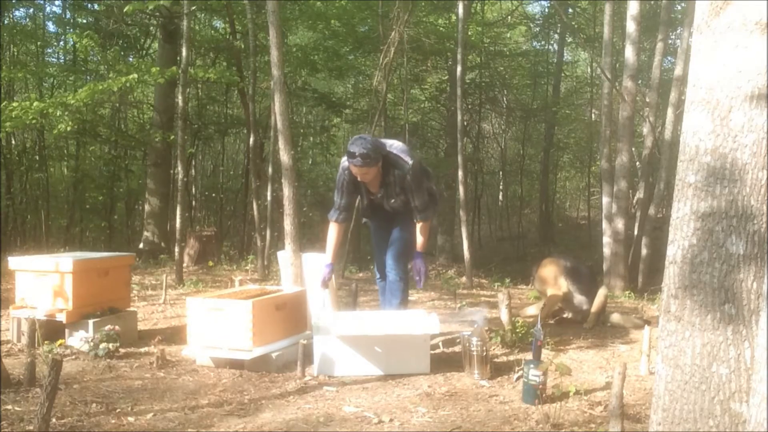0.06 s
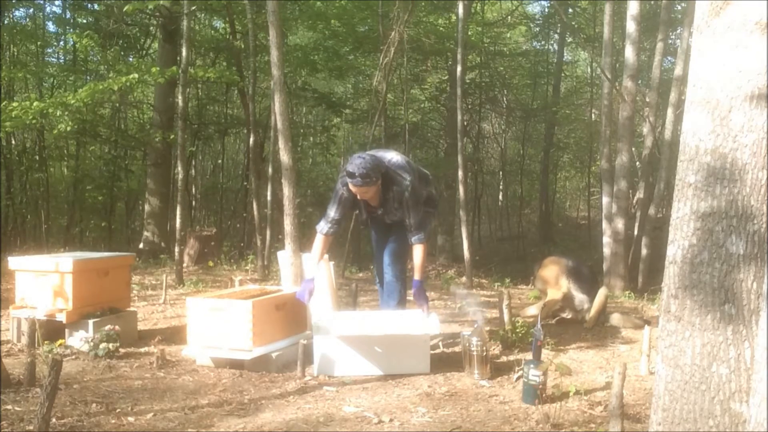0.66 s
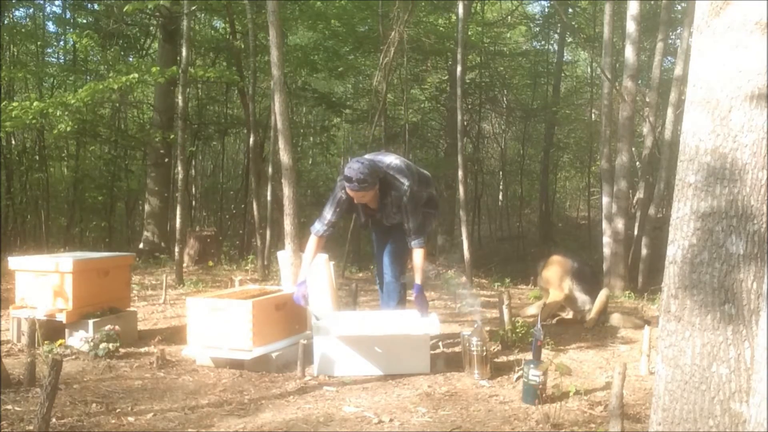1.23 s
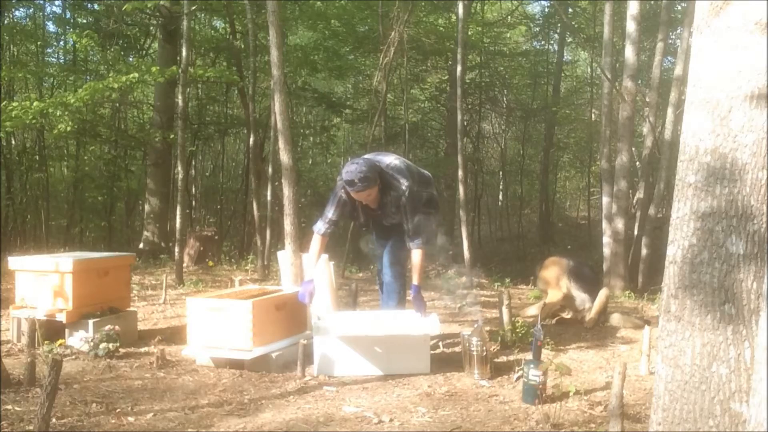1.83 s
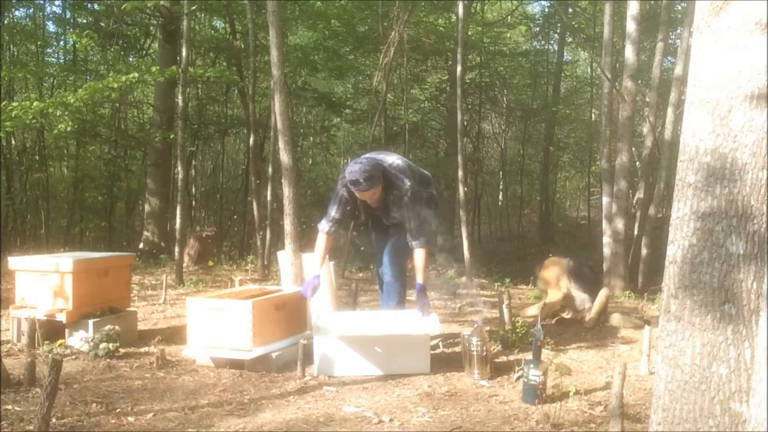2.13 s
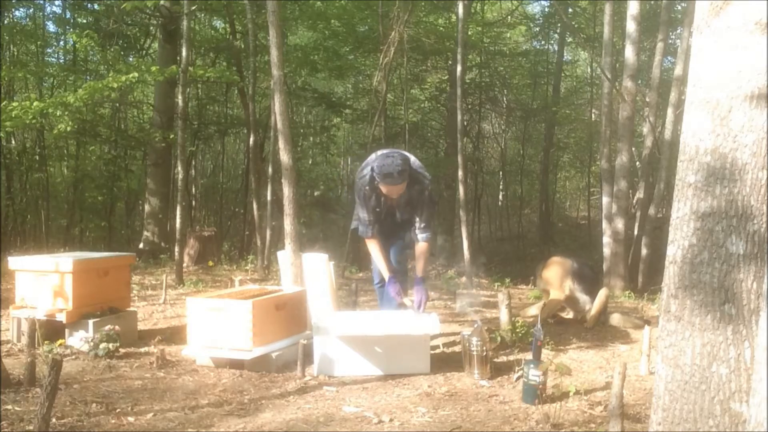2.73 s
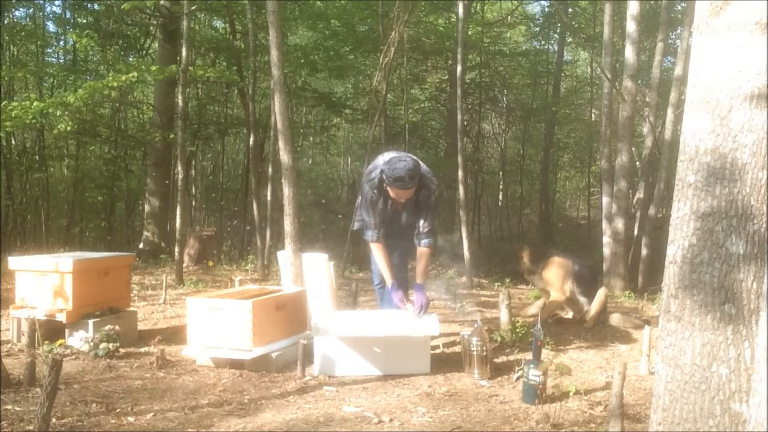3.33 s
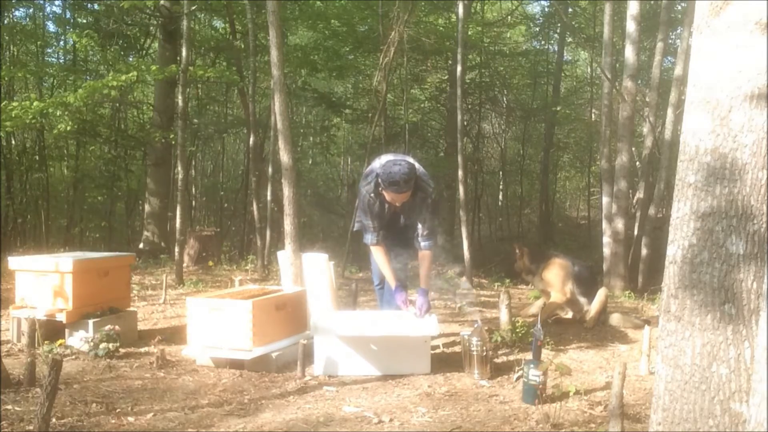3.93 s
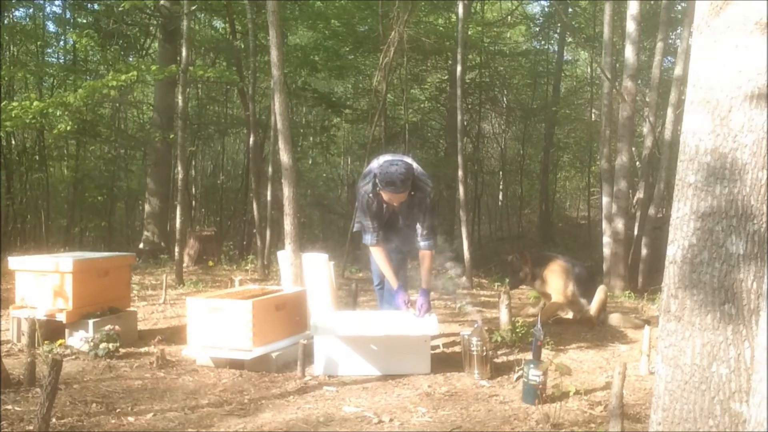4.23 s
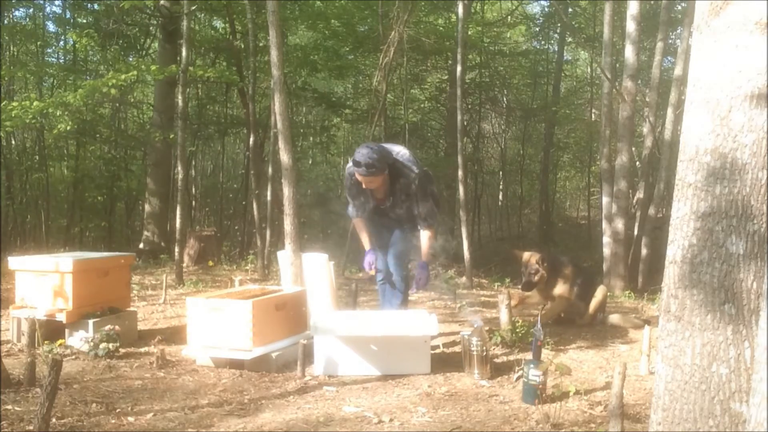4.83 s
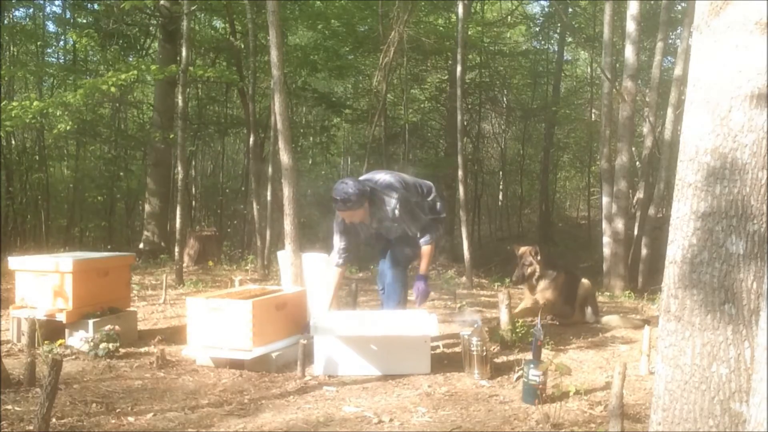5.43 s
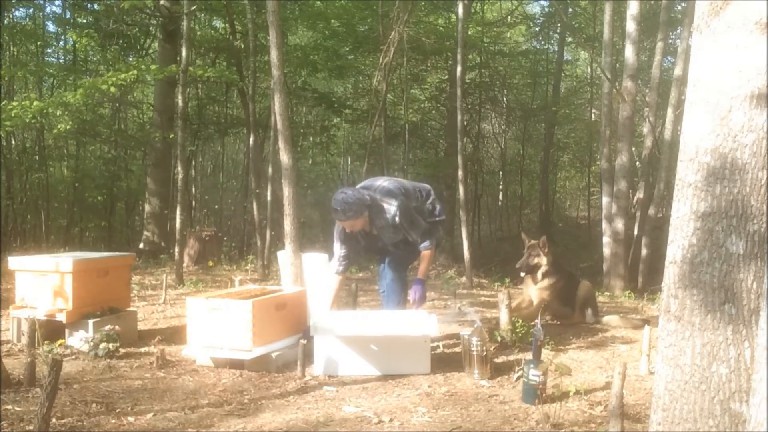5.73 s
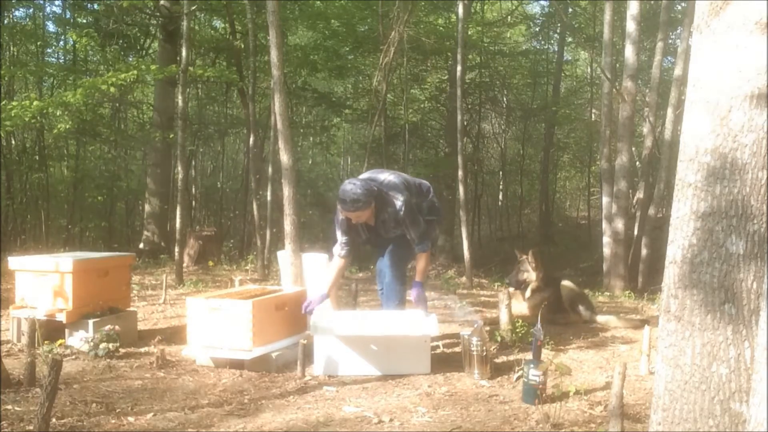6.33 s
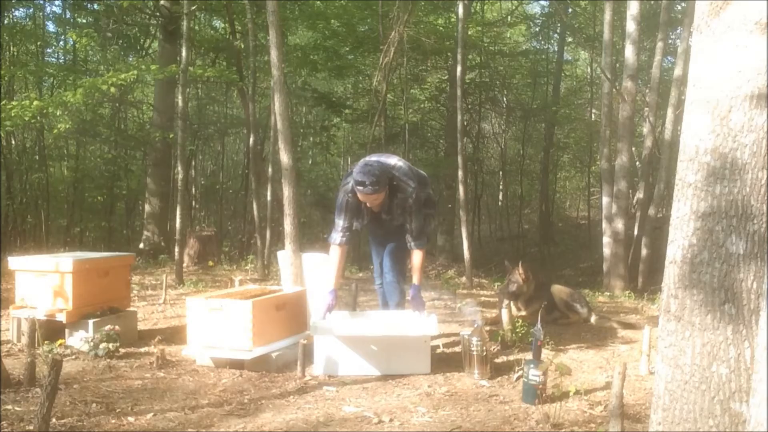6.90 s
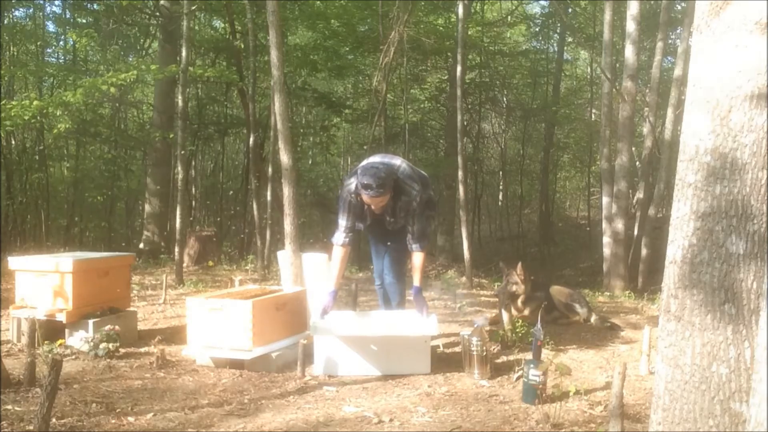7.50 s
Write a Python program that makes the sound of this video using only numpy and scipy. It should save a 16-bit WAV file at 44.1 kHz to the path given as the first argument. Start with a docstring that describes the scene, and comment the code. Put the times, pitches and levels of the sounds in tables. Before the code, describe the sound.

A sharp wooden double knock, lighter bumps and a few metal clinks stand out over softly buzzing bees and a far engine's drone.

```python
"""Open beehive in a wood

Honeybees hum a few metres away, each with its own wingbeat, over a distant engine's drone.
The keeper knocks wooden hive parts together, ringing the box, then picks up a steel tool
that clinks and scrapes. Two birds sing far off, echoed by the trunks; dry leaves rustle faintly."""
import sys
import numpy as np
from scipy import signal
from scipy.fft import rfft, irfft
from scipy.io import wavfile
from scipy.ndimage import map_coordinates

SR = 44100
rng = np.random.default_rng(int(sys.argv[2]) if len(sys.argv) > 2 else 0)


def generate_wav(sig):
    """Save sig (samples, or channels by samples) to the path in sys.argv[1] as 16-bit PCM at SR."""
    pcm = np.round(np.clip(np.atleast_2d(sig).T, -1, 1) * 32767).astype(np.int16)
    wavfile.write(sys.argv[1], SR, pcm)


N = 333396
TIME_S = np.arange(N) / SR


def undb(db):
    """Decibels to gain."""
    return 10 ** (np.asarray(db) / 20)


def unit_rms(x):
    """Scale to rms 1."""
    return x / np.sqrt(np.mean(x ** 2) + 1e-30)


def wander(rate_hz):
    """Smooth random curve, spread near 1."""
    knots = rng.standard_normal(1024)
    return map_coordinates(knots, [TIME_S[::64] * rate_hz + 2], order=3, mode="wrap").repeat(64)[:N]


def colour(x, spectrum):
    """Filter by (f/Hz, gain/dB) points, then scale to rms 1."""
    hz, db = np.transpose(spectrum)
    bins_hz = np.maximum(np.fft.rfftfreq(len(x), 1 / SR), 1)
    gain = undb(np.interp(np.log(bins_hz), np.log(hz), db))
    return unit_rms(irfft(rfft(x) * gain, len(x)))


def highpass(x, cutoff_hz):
    """Second-order low cut."""
    return signal.sosfilt(signal.butter(2, cutoff_hz, "high", fs=SR, output="sos"), x)


def decay(t, t60_s):
    """Exponential fall, 60 dB in t60_s."""
    return np.exp(-np.log(1000) * t / t60_s)


def add(out, start_s, x):
    """Mix x in at start_s."""
    i = max(int(start_s * SR), 0)
    out[i:i + len(x)] += x[:max(N - i, 0)]


def tree_echo(x, t60_s):
    """Diffuse echo scattered back by the trunks."""
    t = TIME_S[:SR]
    response = rng.standard_normal(SR) * decay(t, t60_s) * (1 - np.exp(-t / 0.007))
    return signal.fftconvolve(x, response / np.linalg.norm(response))[:N]


# Wing tone envelope: wingbeat multiple, relative level/dB
WING_HARMONICS = [(1, -1.5), (2, 1), (3, -8), (4, -5), (5, -4.5), (6, -10.5), (8, -27.5), (12, -26)]


def bees(count=24, wingbeat_hz=246.1, spread=0.085, waver=0.03, level_db=-60.5):
    """Each bee has its own wavering wingbeat, and swells and fades as it circles."""
    harmonics = np.arange(1, 15)
    gains = undb(np.interp(harmonics, *np.transpose(WING_HARMONICS)))
    cycle = np.linspace(0, 1, 513)
    out = np.zeros(N)
    for detune in np.linspace(-spread, spread, count):
        offsets = rng.random((len(harmonics), 1))
        stroke = gains @ np.sin(2 * np.pi * (np.outer(harmonics, cycle) + offsets))
        hz = wingbeat_hz * (1 + detune + waver * wander(2.5) + 0.016 * wander(28))
        hum = np.interp(np.cumsum(hz) / SR % 1, cycle, stroke)
        out += hum * undb(3.3 * wander(2.148) + 3.6 * wander(14))
    return unit_rms(out) * undb(level_db)


# Engine drone: firing-rate multiple, relative level/dB
ENGINE_ORDERS = [(2, -10.5), (3, -0.5), (4, -19.5), (5, -18.5), (6, -21)]


def engine(idle_hz=37.25, revved_hz=41.2, idle_db=-60.5, revved_db=-57.5):
    """A far engine idles, speeds up and swells as it pulls; only low orders cross the wood."""
    throttle_s, spin_up_s = 4.65, 1.2
    pull_db, pull_peak_s, pull_width_s = 9.5, 5.61, 0.7
    revs = 1 - np.exp(-(np.maximum(TIME_S - throttle_s, 0) / spin_up_s) ** 2)
    pull = np.exp(-((TIME_S - pull_peak_s) / pull_width_s) ** 2)
    fading_db = 2 * (1 - revs) * wander(3.92)
    level_db = idle_db + (revved_db - idle_db) * revs + pull_db * pull + fading_db
    firing_hz = (idle_hz + (revved_hz - idle_hz) * revs) * (1 + 0.01184 * wander(12))
    phase = 2 * np.pi * np.cumsum(firing_hz) / SR
    drone = sum(undb(db + 2 * wander(11)) * np.sin(order * phase + 0.5 * wander(9))
                for order, db in ENGINE_ORDERS)
    return unit_rms(drone) * undb(level_db)


# Still forest air: f/Hz, relative density/dB
AIR_SPECTRUM = [(20, -40), (40, -7.5), (70, 1), (100, 0), (170, -5), (320, -15.5), (400, -11), (620, -18),
                (1200, -22), (2000, -23), (5000, -32), (7800, -32), (8300, -35.5), (15000, -39)]


def air(level_db=-57):
    """Steady low hush of forest air."""
    return colour(rng.standard_normal(N), AIR_SPECTRUM) * undb(level_db + 0.1 * wander(2))


# Hive box modes: f/Hz, relative level/dB, t60/s
BOX_MODES = [(87, -6.5, 0.067), (148, 0.5, 0.037), (219.5, -1, 0.063), (315, -6, .09), (396, 7, 0.025),
             (435, -25, 0.0074), (613, 0.5, 0.027), (695, -1, 0.037), (780, 3, 0.0096), (986, -14, 0.029),
             (1060, -29, 0.026), (1184, -1, 0.02), (1460, -12, 0.033), (1790, -9.5, 0.032),
             (2387, -1.5, 0.012), (3016, -9, 0.022)]
# Crack of wood: f/Hz, relative density/dB
CRACK_SPECTRUM = [(200, -29), (800, 10), (2500, 0.5), (4200, -8), (6500, -5.5), (10000, -11.5),
                  (15000, -21)]
# Knocks: t/s, blow level/dB, blow f/Hz, crack re blow/dB, thud re blow/dB, thud f/Hz
BOX_KNOCKS = [(.99, -49, 600, -21, -6, 250), (1.3968, -17, 540, -17.5, -4.5, 315),
              (1.428, -15.5, 740, -23.5, -19, 350), (1.522, -44.5, 400, -25, -4, 250),
              (2.136, -42, 318, -20, -5, 250), (3.278, -45.5, 497, -25, 6, 185),
              (4.178, -36, 660, -13, 4.5, 154), (4.2077, -43.5, 2350, -0.5, -22, 250),
              (6.004, -47, 1120, -22, -30, 250), (6.011, -34.5, 287, -24, -12, 220),
              (6.908, -51.5, 1700, -11, -23, 250), (7.55, -39, 450, -34, -17, 250)]


def hive_knocks(give_s=0.0012, width_oct=0.68, crack_t60_s=0.057):
    """Each contact rings the box modes near its own frequency; hard knocks also crack."""
    body, cracks, t = np.zeros(N), np.zeros(N), TIME_S[:SR // 4]
    hz, db, t60_s = np.transpose(BOX_MODES)[:, :, None]
    modes = undb(db) * np.sin(2 * np.pi * hz * t) * decay(t, t60_s)
    modes *= 1 - np.exp(-t / give_s)  # the boards give under the blow
    for start_s, level_db, blow_hz, crack_db, thud_db, thud_hz in BOX_KNOCKS:
        edge = (-0.0018, -10.5, 2010)  # an edge touches first
        blow = (0, 0, blow_hz)
        thud = (0.0029, thud_db, thud_hz)  # the weight lands
        bounce = (0.0095, -16, blow_hz)
        for lag_s, contact_db, contact_hz in (edge, blow, thud, bounce):
            ring = (modes / (1 + (np.log2(hz / contact_hz) / width_oct) ** 2)).sum(axis=0)
            add(body, start_s + lag_s, undb(level_db + contact_db) * ring / np.abs(ring).max())
        crack = colour(rng.standard_normal(len(t)), CRACK_SPECTRUM) * decay(t, crack_t60_s)
        add(cracks, start_s, undb(level_db + crack_db) * crack)
    body = highpass(body, cutoff_hz=80)  # a small box radiates no deep bass
    return body + cracks + tree_echo(undb(-28) * body + undb(-10) * cracks, t60_s=0.36)


# Bird song: t/s, length/s, start f/Hz, end f/Hz, level before direct and echo gains/dB
WHISTLES = [(1.548, 0.13, 2490, 3150, -70), (1.709, 0.089, 3060, 2595, -67),
            (2.109, 0.078, 2710, 2260, -68), (2.28, 0.24, 2506, 2944, -66.5), (2.817, .13, 3080, 2920, -65),
            (2.95, .1, 2700, 2090, -68), (3.142, 0.13, 2410, 2855, -65.5), (3.683, .23, 2870, 2500, -66.5),
            (4.246, 0.025, 3000, 3130, -59), (4.298, .075, 3130, 2340, -64.5),
            (4.521, 0.045, 2160, 1990, -63), (4.71, 0.027, 2994, 3080, -66)]


def whistling_bird(direct_db=-2.5, echo_db=-2, warble_depth=0.0438, pitch_bow=0.0256):
    """Slurred, warbling whistles, smeared by distance."""
    out = np.zeros(N)
    warble = 1 + warble_depth * wander(110)
    for start_s, length_s, start_hz, end_hz, db in WHISTLES:
        progress = np.linspace(0, 1, int(length_s * SR))
        arch = np.sin(np.pi * progress)
        hz = (start_hz + (end_hz - start_hz) * progress) * (1 + pitch_bow * arch)
        hz *= warble[int(start_s * SR):][:len(hz)]
        whistle = np.sqrt(np.abs(arch)) * np.sin(2 * np.pi * np.cumsum(hz) / SR)
        add(out, start_s, undb(db) * unit_rms(whistle))
    return undb(direct_db) * out + undb(echo_db) * tree_echo(out, t60_s=0.98)


def twittering_bird(first_s=2.48, last_s=4.1, count=64, chirp_s=0.0296, centre_hz=3914):
    """A quick run of high chirps from deeper in the wood, heard mostly as echo."""
    out = np.zeros(N)
    progress = np.linspace(0, 1, int(chirp_s * SR))
    for start_s in np.linspace(first_s, last_s, count):
        pitch, slope, strength = rng.uniform(-1, 1, 3)
        hz = centre_hz * (1 + 0.18 * pitch + 0.133 * slope * (2 * progress - 1))
        chirp = np.sin(np.pi * progress) * np.sin(2 * np.pi * np.cumsum(hz) / SR)
        add(out, start_s, undb(-78.5 + 1.1 * strength) * unit_rms(chirp))
    return undb(-5) * out + tree_echo(out, t60_s=0.43)


# Dry leaves: f/Hz, relative density/dB
LEAF_SPECTRUM = [(1500, -4), (2600, 1), (3600, 0.5), (4700, -1), (5600, -12), (9000, -17), (15000, -23)]
# Stirs: t/s, hold/s, level/dB
LEAF_STIRS = [(2.548, 1.73, -69.5), (4.475, 0.29, -69), (4.98, 0.72, -70), (5.74, 0.45, -68.5),
              (6.503, 0.57, -69), (7.45, 0.028, -63.5)]


def leaves(attack_s=0.037, release_s=0.069, patchy_db=2):
    """Grainy rustle of dry leaves: each stir rises, holds unevenly and dies away."""
    grains = rng.standard_normal(N) * undb(2 * wander(180))
    envelope = np.zeros(N)
    for start_s, hold_s, db in LEAF_STIRS:
        before_s = np.maximum(start_s - TIME_S, 0)
        after_s = np.maximum(TIME_S - start_s - hold_s, 0)
        envelope += undb(db) * np.exp(-before_s / attack_s - after_s / release_s)
    return colour(grains, LEAF_SPECTRUM) * envelope * undb(patchy_db * wander(17))


def scrape_force(t, length_s, growth=0.26):
    """Tiny slips of steel, growing until the tool lifts; unit energy."""
    pressure = (t / length_s) ** growth * (t <= length_s)
    spectrum = rfft(rng.standard_normal(len(t)) ** 3 * pressure, 2 * len(t))
    slips = irfft(spectrum / np.sqrt(np.abs(spectrum) + 1e-9))[:len(t)]  # brief slips: even treble
    slips = highpass(slips, cutoff_hz=1700)  # light slips hardly bend the lowest modes
    return slips / np.linalg.norm(slips)


# Tool modes: f/Hz, undamped t60/s, relative level/dB struck on the tip, on the edge, on the flat
TOOL_MODES = [(1122, .16, -25, -13, 2), (1572, .2, -23, -17, -19), (1832, .22, -12, -3, -6),
              (2304, .2, -21, -7, -14), (2665, .2, -23, -7, -21), (3444, .22, -18, -6, -4),
              (3691, .26, -10, -3, -7.5), (4597, .4, -25, -8, -5), (4893, .19, -18, -6, 2),
              (5648, .19, -22, -8, -3), (6333, .27, -12, 1, -7), (6641, .24, -17, -6, -1),
              (7956, .16, -9, -8, -6), (9022, .16, -4, -18, -14), (9422, .12, -7, -11, -9),
              (10000, .17, 2, -17, -11), (11288, .17, -15, -23, -14), (11840, .2, -7, -31, -20),
              (13150, .17, -22, -27, -21), (13900, .18, -23, -30, -24), (14270, .2, -27, -32, -24),
              (15090, .18, -27, -24, -24)]
# Contact tick: f/Hz, relative density/dB
TICK_SPECTRUM = [(800, -38), (2000, -27), (3000, 2), (5000, 0), (6500, 6), (8000, 2), (9800, -14),
                 (11000, 0), (15000, -31)]
# Tool contacts: t/s, place struck, gain/dB, scrape length/s, scrape re blow/dB
TOOL_CONTACTS = [(5.4155, "tip", -31.5, 0.017, -13), (5.44, "tip", -40, 0.0097, -7),
                 (5.4595, "tip", -34.5, 0.015, 3.5), (5.492, "edge", -52.5, .006, -7),
                 (5.516, "tip", -42, 0.0038, 1.5), (5.5515, "tip", -44.5, 0.0022, -16),
                 (5.8, "flat", -68, 0.047, 24), (6.118, "edge", -41, 0.028, 4),
                 (6.259, "flat", -28, 0.079, 2.5)]


def steel_tool(tick_db=-15, tick_t60_s=0.019, rattle_db=-11, rattle_width=0.014, echo_db=-29):
    """A blow and a scrape ring the steel; the place struck weights the modes."""
    out, t = np.zeros(N), TIME_S[:SR // 3]
    bins_hz = np.fft.rfftfreq(len(t), 1 / SR)
    hz, t60_s, *place_db = np.transpose(TOOL_MODES)[:, :, None]
    place_gains = dict(zip(("tip", "edge", "flat"), undb(place_db)))
    t60_scale = {"tip": 0.52, "edge": 0.8, "flat": 0.7}  # damped by what the tool rests against
    for start_s, place, db, scrape_s, scrape_db in TOOL_CONTACTS:
        gains, ring_t60_s = place_gains[place], t60_s * t60_scale[place]
        phase = 2 * np.pi * (hz * t + rng.random(hz.shape))
        ring = (gains * np.sin(phase) * decay(t, ring_t60_s)).sum(axis=0)
        # buzzing against the contact spreads each mode into a band
        bands = (gains / (1 + ((bins_hz - hz) / (rattle_width * hz)) ** 4)).sum(axis=0)
        rattle = unit_rms(irfft(bands * rfft(rng.standard_normal(len(t))), len(t)))
        rattle *= decay(t, 0.64 * ring_t60_s.mean())
        tick = colour(rng.standard_normal(len(t)), TICK_SPECTRUM) * decay(t, tick_t60_s)
        response = ring / 2 + np.linalg.norm(gains) * (undb(rattle_db) * rattle + undb(tick_db) * tick)
        force = undb(scrape_db) * scrape_force(t, scrape_s)
        force[0] += 1  # the blow
        add(out, start_s, undb(db) * signal.fftconvolve(force, response))
    return out + undb(echo_db) * tree_echo(out, t60_s=0.22)


# Wood friction: f/Hz, relative density/dB
SLIDE_SPECTRUM = [(200, 5), (800, 5), (2500, -11), (4200, -16), (15000, -28)]
# Slide envelope: t/s, level/dB
SLIDE_LEVELS = [(7.2, -94), (7.35, -59.5), (7.45, -62), (7.52, -58.5), (7.56, -51)]


def wood_slide(roughness_db=2.7):
    """Wood rubs on wood: rough, swelling noise."""
    friction = rng.standard_normal(N) * undb(roughness_db * wander(120))
    level_db = np.interp(TIME_S, *np.transpose(SLIDE_LEVELS))
    return colour(friction, SLIDE_SPECTRUM) * undb(level_db)


def scene():
    """Mono sum of all sources."""
    background = bees() + engine() + air()
    events = hive_knocks() + whistling_bird() + twittering_bird() + leaves() + steel_tool() + wood_slide()
    return (background + events)[None]


def record(dry, cutoff_hz=15400):
    """Steep low-pass on the top treble."""
    return signal.sosfilt(signal.ellip(10, 0.2, 80, cutoff_hz, fs=SR, output="sos"), dry)


dry = scene()
out = record(dry)
generate_wav(out)
```